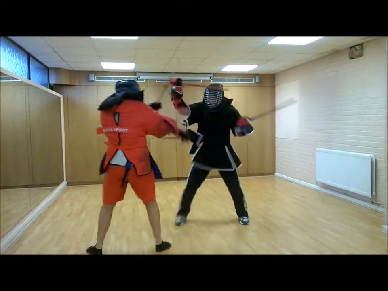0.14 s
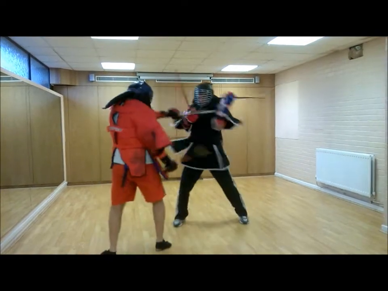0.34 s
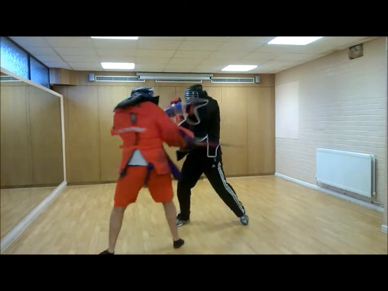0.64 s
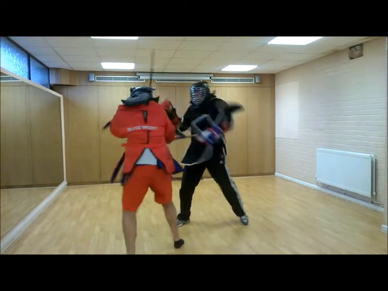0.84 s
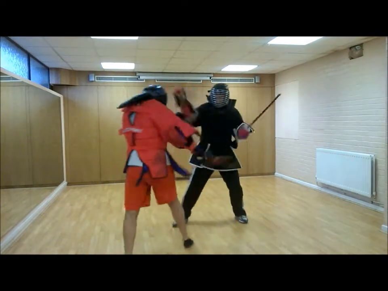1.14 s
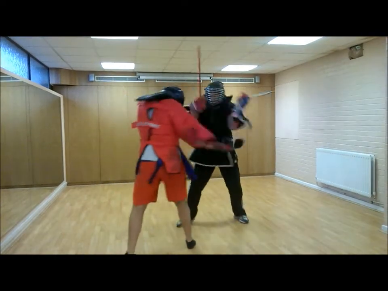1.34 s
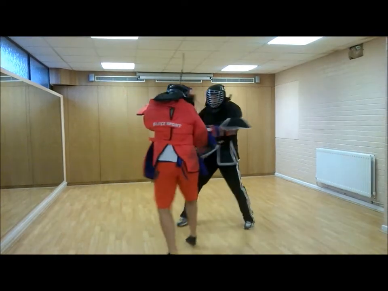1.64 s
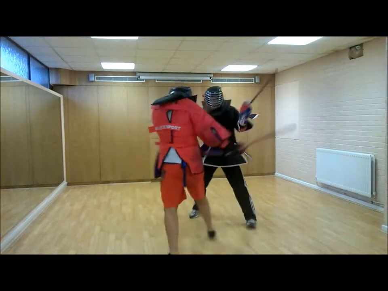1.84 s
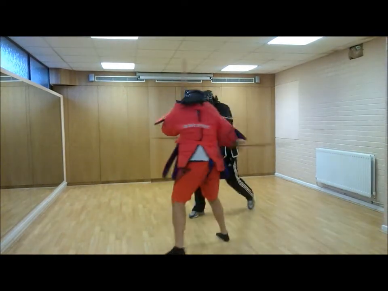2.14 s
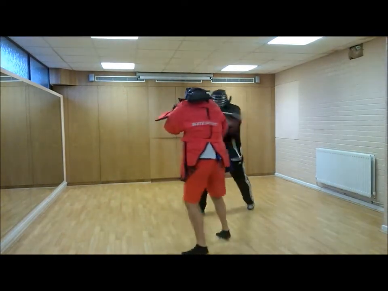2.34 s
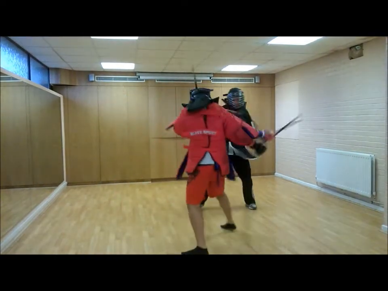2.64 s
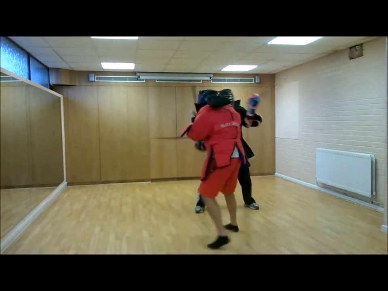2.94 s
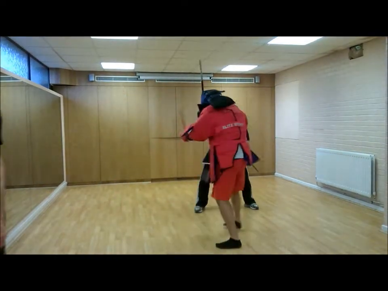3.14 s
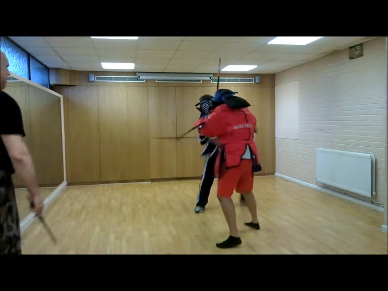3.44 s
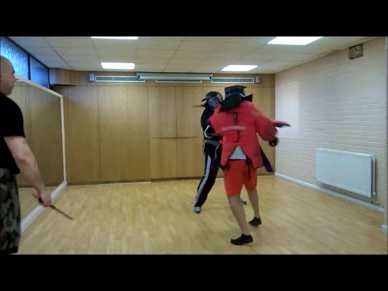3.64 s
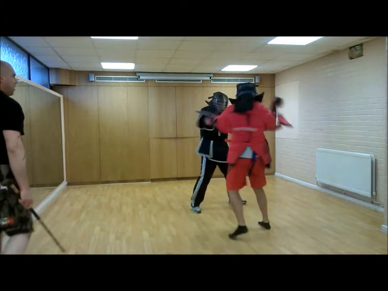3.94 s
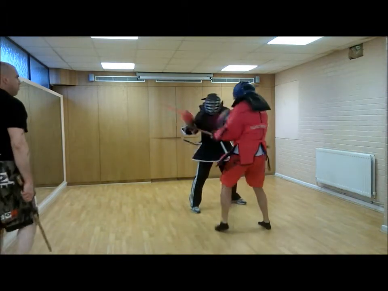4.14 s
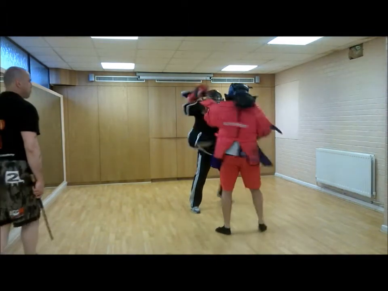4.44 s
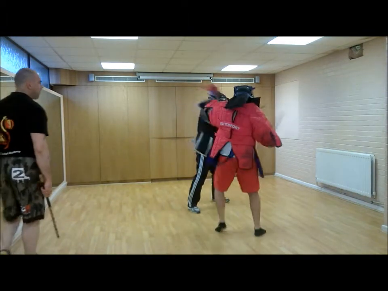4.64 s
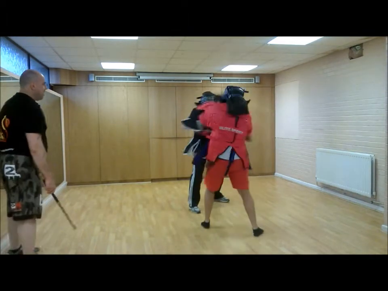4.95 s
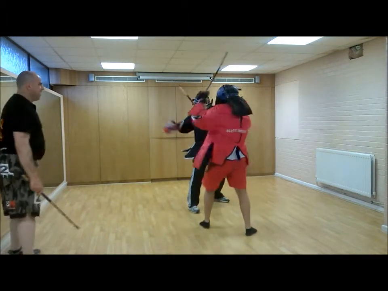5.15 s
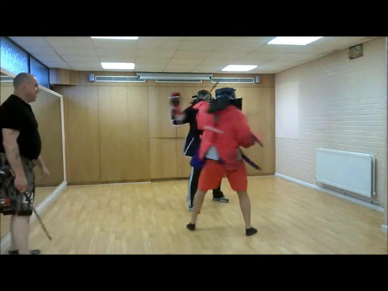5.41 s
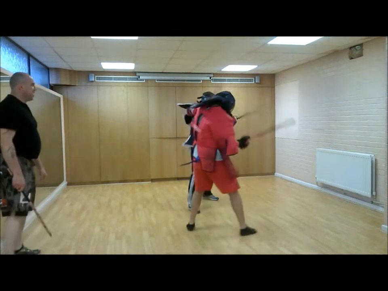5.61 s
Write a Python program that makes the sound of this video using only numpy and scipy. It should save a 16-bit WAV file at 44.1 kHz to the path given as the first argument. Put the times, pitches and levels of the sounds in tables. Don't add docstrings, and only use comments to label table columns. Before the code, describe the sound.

Close-quarters stick sparring, heard from a few metres away in a live room with a wooden floor. Dry cane cracks and woody knocks come first, followed by rapid pad slaps, then heavier jacket thuds and swishing cloth. Shoes scuff and step quietly between blows. The final second thins to muffled thumps, weaker clacks and scuffs over low room hum and hiss.

```python
import sys
import numpy as np
from scipy import signal
from scipy.fft import rfft, irfft
from scipy.io import wavfile
from scipy.ndimage import uniform_filter1d

SR = 44100
rng = np.random.default_rng(int(sys.argv[2]) if len(sys.argv) > 2 else 0)


def invert_db(level):
    return 10 ** (np.asarray(level, dtype=float) / 20)


def generate_wav(signal):
    frames = np.transpose(np.atleast_2d(signal))
    scaled = np.clip(frames, -1, 1) * 32767
    pcm = np.round(scaled).astype(np.int16)
    wavfile.write(sys.argv[1], SR, pcm)


N = 254744
RING = 25000
HEAD = 1500
SIZE = 4096
WALL_S = .0103
SILENT_DB = -90
DRAG_MS, DRAG_PER_CONTACT = 1.3, 3.1

# frequency in Hz, density in dB per Hz.
AIR_SPECTRUM = [(18, -31), (30, -3), (120, 18), (852, 0), (1170, -5), (1330, 4.5), (2300, -7), (5890, -5.5),
                (10500, -1), (12900, -4), (15500, -25)]


def air():
    hz, db = np.transpose(AIR_SPECTRUM)
    octave = np.log(np.fft.rfftfreq(N, 1 / SR) + 1)
    colour = invert_db(np.interp(octave, np.log(hz), db))
    hiss = irfft(rfft(rng.standard_normal(N)) * colour, N)
    steps = np.repeat(rng.standard_normal(N // 4000 + 1), 4000)
    swell = uniform_filter1d(steps, 4000)[:N]
    return hiss / np.std(hiss) * invert_db(-51.5 + 0.86 * swell)


# frequency in Hz, time to fall by 60 dB in seconds.
REVERBERATION = [(60, 0.78), (150, 0.48), (350, 0.44), (800, 0.36), (1800, 0.36), (4000, 0.44),
                 (8000, 0.41), (14000, 0.26)]


def tail(ms, drag_ms):
    t = np.arange(RING) / SR
    noise = rfft(rng.standard_normal(RING))
    octave = np.log(np.fft.rfftfreq(RING, 1 / SR) + 1)
    hz, t60 = np.transpose(REVERBERATION)
    age = t - drag_ms / 1000 * (1 - np.exp(-t * 1000 / drag_ms))
    ring = 0
    for share, seconds in zip(np.eye(len(hz)), t60):
        band = irfft(noise * np.interp(octave, np.log(hz), share), RING)
        ring = ring + band * invert_db(-60 * age / seconds)
    clumps = np.repeat(rng.standard_normal(RING // 40), 40)
    clumping = invert_db(1.8 * clumps * np.exp(-t / 0.038))
    pushed = 1 - (1 + t * 2000 / ms) * np.exp(-t * 2000 / ms)
    build_up = 1 - np.exp(-t / 0.0028)
    return ring * clumping * np.sqrt(pushed) * build_up


def contacts(ms, grit_db, count):
    t = np.arange(1, SIZE // 2 + 1) / SR / (ms / 1000)
    bursts = invert_db(grit_db * rng.exponential(size=(count, len(t))))
    grit = bursts * rng.standard_normal((count, len(t)))
    push = t * np.exp(-t) * grit
    push = push / np.sqrt(np.sum(push ** 2, axis=1, keepdims=True))
    click = np.exp(-ms / 3.2)
    push = push * np.sqrt(1 - click)
    push[:, 0] -= np.sqrt(click)
    return push


def hall(ms, wall_db, drag_ms):
    heard = invert_db(-20) * tail(ms, drag_ms)
    chance = rng.random((24, 2))
    lags = .0015 + .06 * chance[:, 0]
    paths_db = -6 - 120 * lags + 9.3 * (chance[:, 1] - .5)
    lags[:4] = [0, .002 + 0.0088 * chance[1, 0], WALL_S, WALL_S + 0.00069 + 0.0012 * chance[3, 0]]
    paths_db[:4] = [3.5, -4.5, -5.8, -1.5]
    wall = int(WALL_S * SR)
    heard[:wall] *= invert_db(-wall_db - 1.0)
    paths_db = paths_db - wall_db * (lags < WALL_S)
    pushes = contacts(ms, 1.93, count=24)
    for lag, db, push in zip((lags * SR).astype(int), paths_db, pushes):
        heard[lag:lag + len(push)] += invert_db(db) * push
    above_4070_hz = signal.butter(1, 4070, "high", fs=SR, output="sos")
    treble = signal.sosfilt(above_4070_hz, heard[:2 * wall])
    shade = glint = invert_db(-3.5)
    heard[:wall] -= (1 - shade) * treble[:wall]
    heard[wall:wall + 80] += glint * treble[wall:wall + 80]
    return heard / np.sqrt(np.mean(heard[:HEAD] ** 2))


def resonance(hz, q):
    f = np.fft.rfftfreq(SIZE, 1 / SR) + 1
    return 1 / (1 + (q * (f / hz - hz / f)) ** 2) ** 2


def layer(hz, q, db):
    power = resonance(hz, q)
    return power / power.mean() * invert_db(db) ** 2


def grain():
    octaves = np.log2(np.fft.rfftfreq(SIZE, 1 / SR) + 1)
    steps = np.arange(0, 15, 1 / 16)
    rough_db = 1.9 * np.interp(octaves, steps, rng.standard_normal(len(steps)))
    return invert_db(rough_db) ** 2


def minimum_phase(power):
    cepstrum = irfft(np.log(power) / 2)
    cepstrum[1:SIZE // 2] *= 2
    cepstrum[SIZE // 2 + 1:] = 0
    return irfft(np.exp(rfft(cepstrum)))


def cane(low_hz, low_db, middle_hz, middle_db, drag_ms):
    top_hz = 9980 * 2 ** (0.36 * (rng.random() - .5))
    return low_hz, low_db, middle_hz, middle_db, top_hz, drag_ms


# time in seconds, extra shade in dB.
TURNING = [(0, -1.5), (1.5, -1.5), (1.9, 2.5), (2.4, 1), (2.65, -4.5), (3.2, 1), (3.5, -1.5), (4.2, -1),
           (5.1, 0.5)]
# start of the blow in seconds, frequency in Hz, level in dB.
RINGING_NOTES = [(-0.008, 3160, 2.5), (0.125, 875, 2), (0.274, 1570, 4.5), (0.717, 940, 9.5),
                 (0.8, 3300, 4), (0.947, 3550, 4), (1.186, 1700, 9), (1.26, 604, 3), (1.43, 2960, 3),
                 (1.514, 1500, 2), (2.08, 2650, 2), (2.636, 3800, 4.5), (2.892, 1370, 8.5),
                 (2.977, 3700, 4.5), (3.188, 2120, 4), (3.463, 1150, 6), (3.49, 258, 3.5), (3.672, 1390, 4),
                 (4.022, 690, 3), (4.438, 3900, 5.5), (4.613, 2780, 5), (5.068, 377, 7.5), (5.101, 1030, 7),
                 (5.363, 3000, 1), (0.539, 590, 1.5), (2.244, 635, 4), (2.414, 960, 2), (3.886, 566, 3.5),
                 (5.7, 2690, 9)]


def blow(stick, armour, rattan):
    s, clack_db, clack_hz, snap_db, snap_hz, ms = stick
    thud_db, thud_hz, knock_db, knock_hz, boom_db, wall_db = armour
    low_hz, low_db, middle_hz, middle_db, top_hz, drag_ms = rattan
    power = layer(clack_hz, 0.58, clack_db)
    power += layer(snap_hz, 0.52, clack_db + snap_db)
    power += layer(thud_hz, 0.59, thud_db)
    power += layer(knock_hz, 0.6, thud_db + knock_db)
    power += layer(39, 1.8, thud_db + boom_db - 8)
    notes = [(hz, db) for at, hz, db in RINGING_NOTES if abs(at - s) < .008]
    modes = [(low_hz, low_db), (middle_hz, middle_db), (top_hz, 4.0), *notes]
    for hz, db in modes:
        power *= invert_db(np.clip(db, 0, 7) * resonance(hz, 3.2)) ** 2
    shade_db = wall_db + np.interp(s, *np.transpose(TURNING))
    heard = hall(max(ms, .05), shade_db, max(drag_ms, .1))
    return signal.fftconvolve(heard, minimum_phase(power * grain()))[:RING]


# start in seconds, boom level in dB.
STAMPS_ON_FLOOR = [
    (0.659, -39),
    (1.43, -38),
    (1.52, -38),
    (3.6, -36),
    (4.14, -47),
    (3.489, -25),
    (5.023, -38),
    (5.55, -44),
]


def stamp(s, boom_db):
    return ((s, SILENT_DB, 2000, 0, 8000, 3.0),
            (SILENT_DB, 200, 0, 600, boom_db - SILENT_DB, 0),
            cane(600, 0, 2000, 0, DRAG_MS))


# time in seconds at which the tick is heard off the
# wall (struck 10 ms earlier), level in dB.
TICKS_OFF_WALL = [
    (0.599, -23.5),
    (2.7567, -32.5),
    (3.0304, -20.5),
    (3.6826, -54),
    (3.7556, -40),
]


def tick(s, db):
    return ((s - WALL_S, db - 21, 4500, 12, 9500, 0.1),
            (SILENT_DB, 200, 0, 600, 0, 25),
            cane(600, 0, 2000, 0, 0.1))


# start in seconds, level in dB, scuff frequency in Hz, contact in ms.
FOOT_SHUFFLES = [(0.658, -33.5, 400, 11), (1.602, -43, 130, 4.5), (1.729, -41, 590, 100),
                 (2.045, -46, 400, 44), (2.29, -28.5, 990, 4.7), (2.896, -31, 150, 2.2),
                 (3.193, -26, 152, 3.6), (4.022, -32.5, 630, 12), (4.819, -47, 550, 1.4),
                 (5.524, -35, 575, 13), (5.125, -44, 170, 8.2), (5.568, -35.5, 300, 10)]


def shuffle(s, db, hz, ms):
    return ((s, db - 12.5, 2000, -3, 8300, ms),
            (db - 10.5, 0.58 * hz, 3.0, hz, -15, 0.6),
            cane(hz, 1.6, 2800, 1.6, DRAG_MS))


# start in seconds, hiss level in dB, cane in dB over the hiss,
# contact in ms.
CLOTH_SWIPES = [
    (3.886, -19.5, -12, 11.7),
    (4.1374, -22, -31, 12),
    (4.613, -25, -10, 19),
]


def swipe(s, hiss_db, cane_db, ms):
    return ((s, hiss_db + cane_db, 2450, -cane_db, 11500, ms),
            (hiss_db + cane_db - 11.5, 400, 13.5, 950, -15, 1.5),
            cane(500, 2.4, 2600, 2.2, DRAG_MS + 1.5 * ms))


# start in seconds, thud level in dB, thud frequency in Hz,
# cloth in dB over the thud, contact in ms.
JACKET_THUMPS = [
    (0.456, -33, 184, -1.5, 0.39),
    (2.2439, -20.5, 590, -11, 1.5),
    (2.8918, -26, 400, -10.5, 1.3),
    (3.4623, -29.5, 410, 1, 4.2),
    (3.4901, -15, 240, -5, 1.8),
    (4.1378, -12.5, 332, -7, 4.6),
    (5.023, -25, 308, -7, 3.9),
    (5.068, -22, 320, -13, 3.6),
    (5.103, -28, 423, -12, 1.5),
]


def thump(s, thud_db, thud_hz, cloth_db, ms):
    knock_over_thud_db = -6 - 7.3 * np.log2(thud_hz / 280)
    return ((s, thud_db + cloth_db - 3.0, 1850, 1.5, 8900, ms),
            (thud_db, thud_hz, knock_over_thud_db, 800, -22, 2.5),
            cane(1.104 * thud_hz, 1.8, 1500, 2.3, DRAG_MS + 60 * invert_db(thud_db)))


# start in seconds, knock level in dB, knock frequency in Hz,
# cloth in dB over the knock, contact in ms.
CHEST_KNOCKS = [
    (0.5391, -13.5, 530, -7.5, 0.44),
    (0.717, -22.5, 760, -14.5, 0.47),
    (1.26, -21, 547, -6.5, 6.7),
    (1.5134, -16, 720, -3.5, 1.2),
]


def knock(s, knock_db, knock_hz, cloth_db, ms):
    return ((s, knock_db + cloth_db, 1850, -1.5, 8400, ms),
            (knock_db - 5, 140, 4.0, knock_hz, -24, 0.6),
            cane(1.06 * knock_hz, 2.0, 2.07 * knock_hz, 0.91, DRAG_MS + 1.3 * ms))


# start in seconds, knock level in dB, knock frequency in Hz,
# contact in ms, drag over the cloth in ms.
PAD_SLAPS = [
    (2.0803, -17.5, 1300, 0.24, 47),
    (2.4135, -18.5, 870, 1.1, 4),
    (2.6358, -16, 2130, 0.5, 13.5),
    (2.977, -18, 1300, 9.1, 21),
    (3.188, -20.5, 664, 1.4, 35),
]


def slap(s, knock_db, knock_hz, ms, drag_ms):
    octaves = np.log2(knock_hz / 1000)
    clack_hz = 2400 * (knock_hz / 1000) ** 0.78
    under_db = 11 + 6.7 * octaves
    return ((s, knock_db, clack_hz, -3 - 0.12 * drag_ms - 2.4 * octaves, 6500, ms),
            (knock_db - under_db, 330, under_db, knock_hz, -14, 1.0 + 0.087 * drag_ms),
            cane(0.87 * knock_hz, 1.5, 0.95 * clack_hz, 1.2, drag_ms))


# start in seconds, clack level in dB, clack frequency in Hz,
# knock of the cane in dB over the clack, contact in ms.
STICK_CLACKS = [(-0.008, -18, 2870, -3, 0.89), (0.1254, -31.5, 2060, 11, 2.7),
                (0.2737, -23.5, 2480, -7, 0.59), (0.509, -30.5, 2330, -14, 4.8),
                (0.7998, -29, 2650, 2.5, 0.55), (0.9465, -15.5, 2860, -7, 0.079),
                (1.1855, -38.5, 1520, 2, 0.24), (1.43, -23.5, 3260, -8, 4.9), (1.7972, -25, 2600, -6, 0.89),
                (3.673, -31, 1960, -10, 5.9), (3.741, -35, 2280, -2.5, 6.3), (4.105, -34, 2350, -17, 2.5),
                (4.205, -20.5, 1940, -5, 6.9), (4.438, -18, 3350, -3.5, 1.1), (4.491, -28, 2780, 5, 2.9),
                (5.161, -37.5, 1970, -5, 1.7), (5.363, -25, 2180, -9, 12.4), (5.44, -44, 2470, -25, 2.9),
                (5.699, -53.5, 2800, -18, 28)]


def clack(s, clack_db, clack_hz, knock_db, ms):
    octaves = np.log2(clack_hz / 2400)
    knock_hz = 0.51 * clack_hz
    under_db = 11 + 13.0 * octaves
    return ((s, clack_db, clack_hz, -18 - 17.0 * octaves, 7500, ms),
            (clack_db + knock_db - under_db, 270, under_db, knock_hz, -12, 1.5),
            cane(1.02 * knock_hz, 0.83, 1.184 * clack_hz, 1.67, DRAG_MS + DRAG_PER_CONTACT * ms))


def scene():
    out = np.zeros(HEAD + N + RING)
    kinds = ((stamp, STAMPS_ON_FLOOR), (tick, TICKS_OFF_WALL), (shuffle, FOOT_SHUFFLES),
             (swipe, CLOTH_SWIPES), (thump, JACKET_THUMPS), (knock, CHEST_KNOCKS),
             (slap, PAD_SLAPS), (clack, STICK_CLACKS))
    for kind, rows in kinds:
        for row in rows:
            start = HEAD + int(row[0] * SR)
            out[start:start + RING] += blow(*kind(*row))
    return (out[HEAD:HEAD + N] + air())[None]


def band_limit(x):
    return signal.sosfilt(signal.butter(12, 16520, fs=SR, output="sos"), x)


def record(dry):
    band = signal.butter(2, [34, 13000], "band", fs=SR, output="sos")
    mic = signal.sosfilt(band, dry)
    mic = mic + invert_db(-64) * rng.standard_normal(mic.shape)
    rounded = mic / (1 + (mic / 1.05) ** 4) ** .25
    top = signal.ellip(10, .3, 55, 15850, fs=SR, output="sos")
    return band_limit(signal.sosfilt(top, rounded))


dry = scene()
out = record(dry)
generate_wav(out)
```